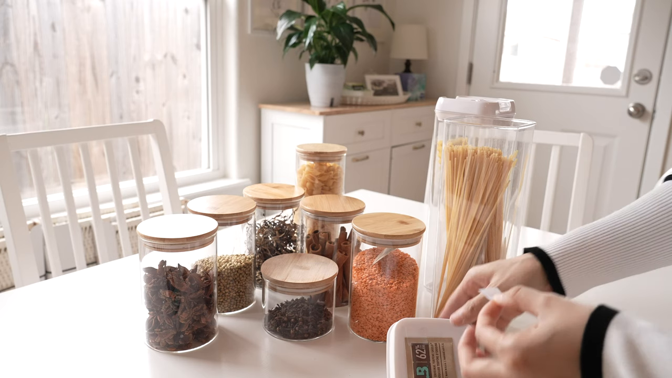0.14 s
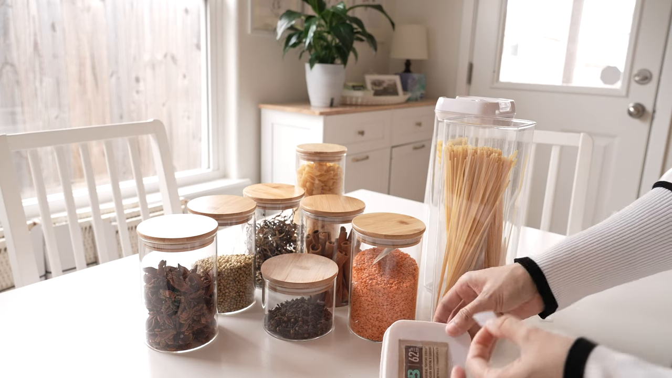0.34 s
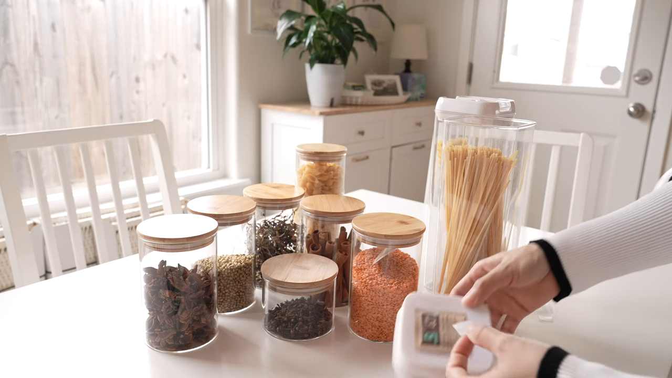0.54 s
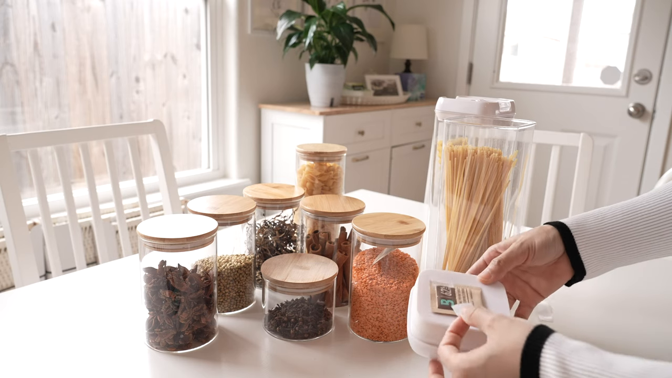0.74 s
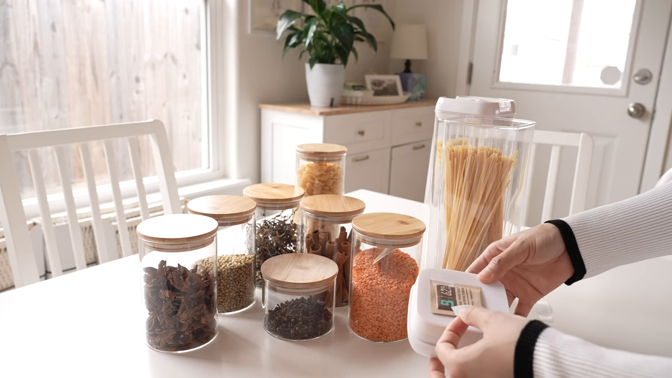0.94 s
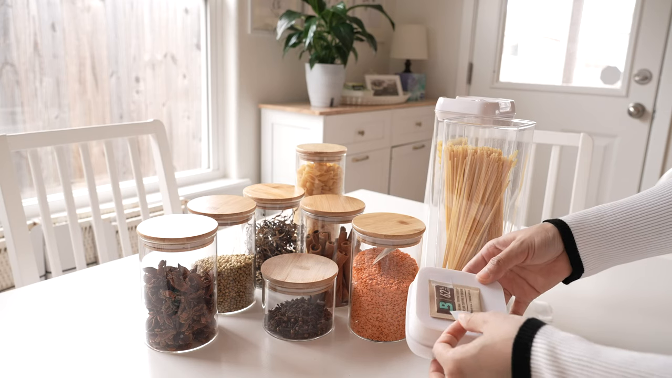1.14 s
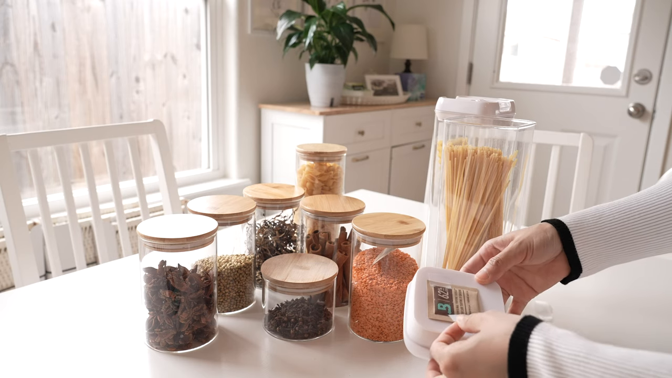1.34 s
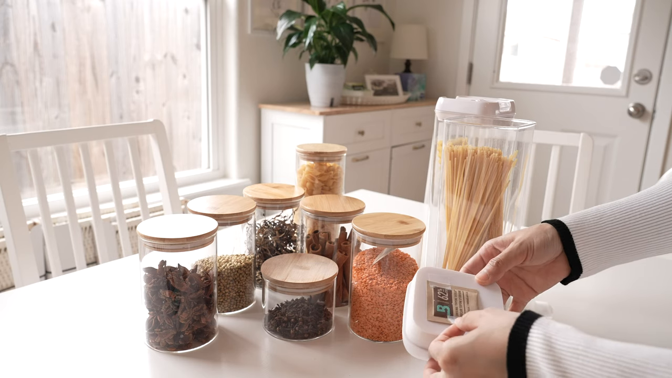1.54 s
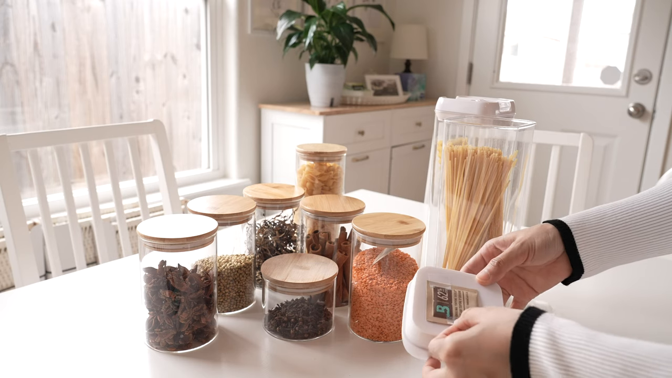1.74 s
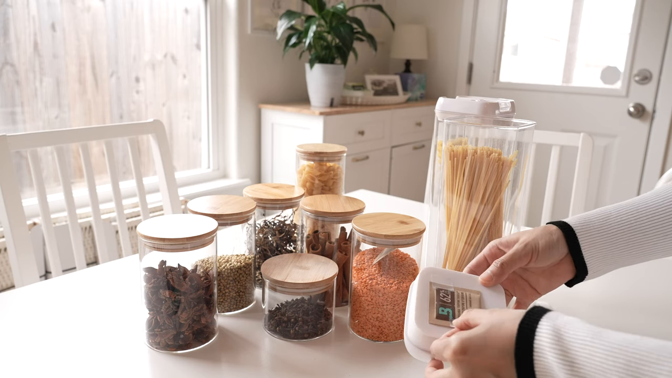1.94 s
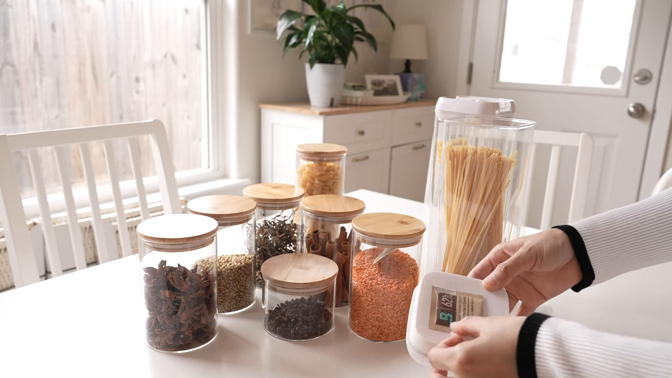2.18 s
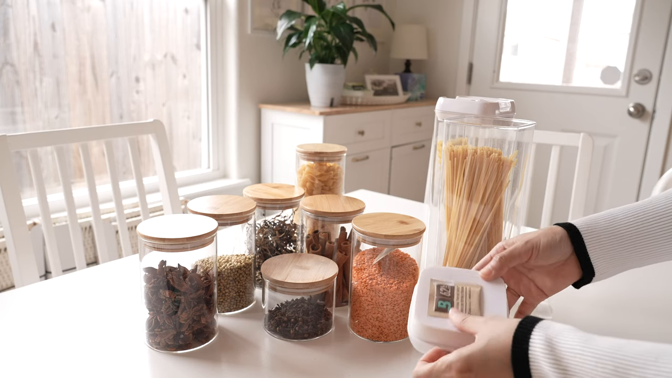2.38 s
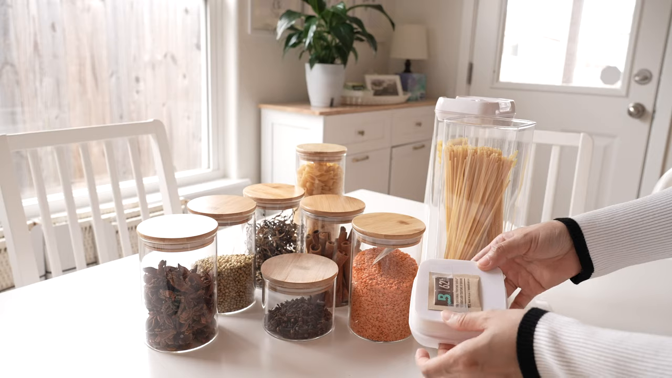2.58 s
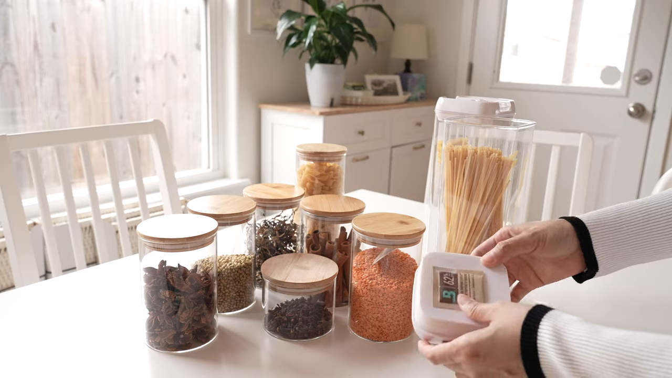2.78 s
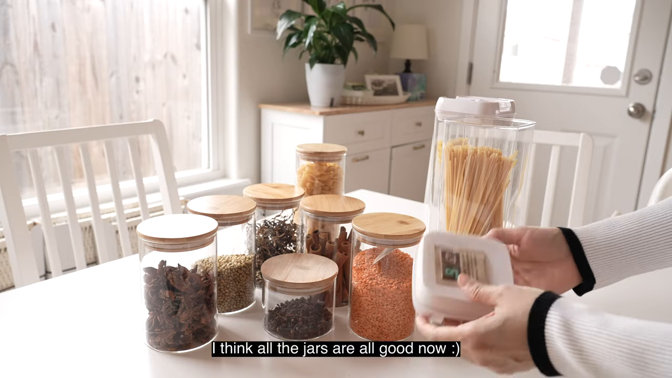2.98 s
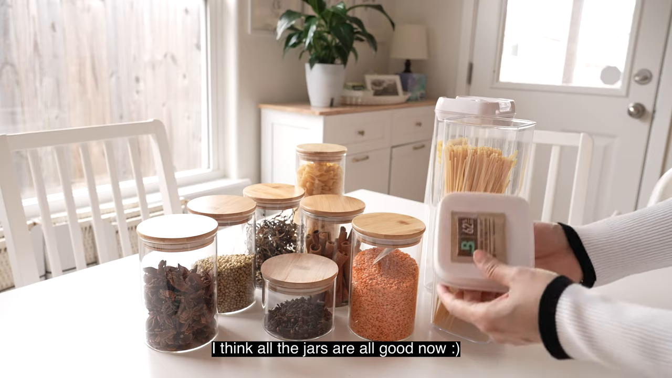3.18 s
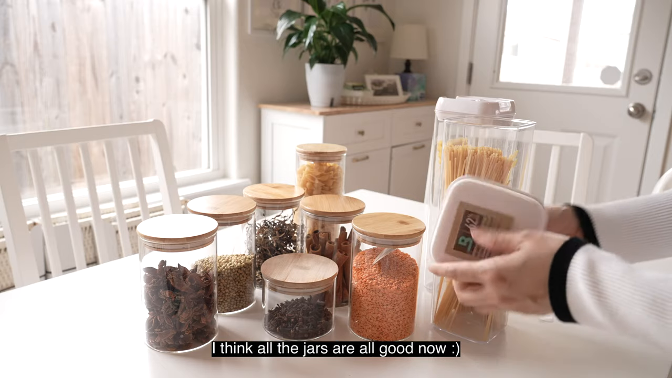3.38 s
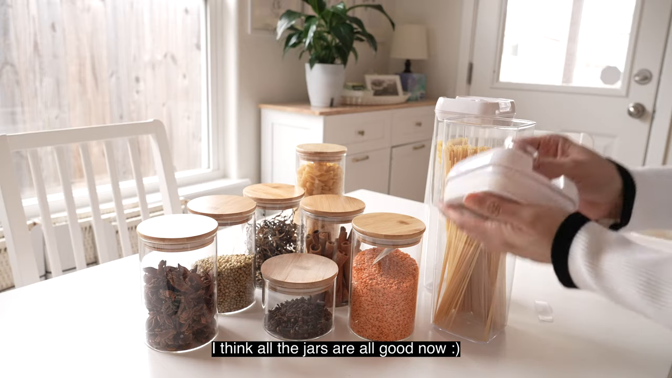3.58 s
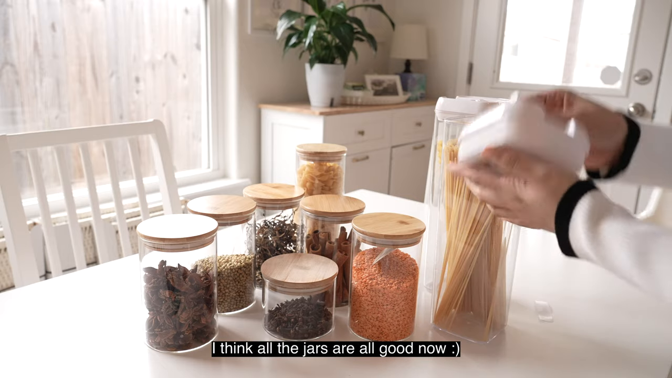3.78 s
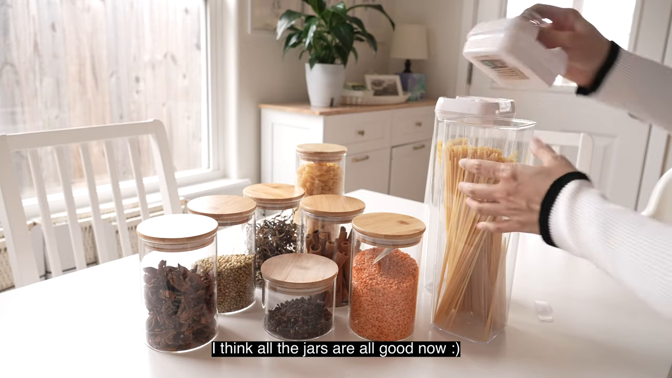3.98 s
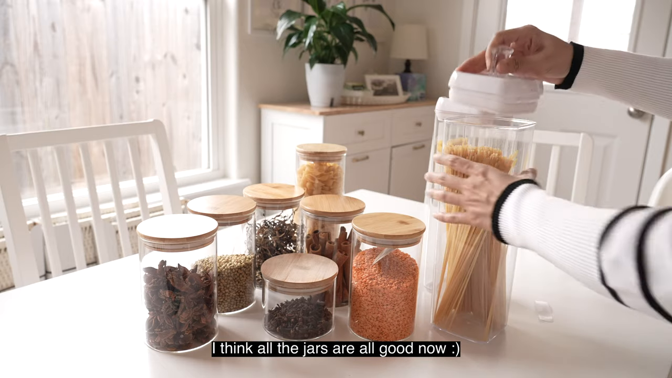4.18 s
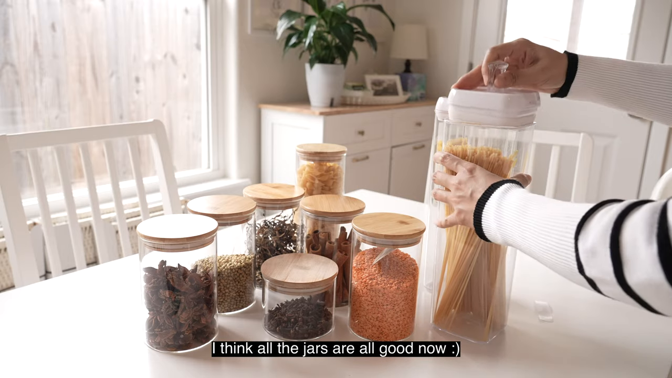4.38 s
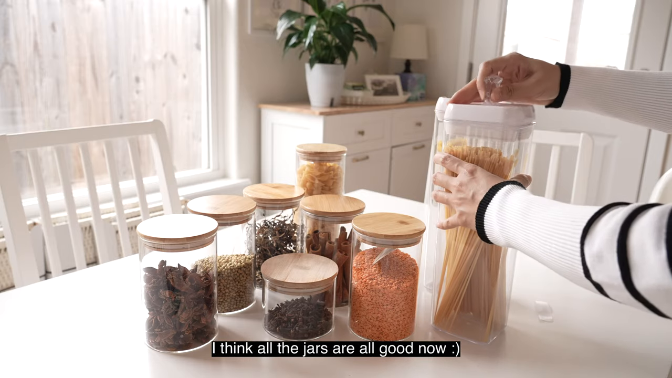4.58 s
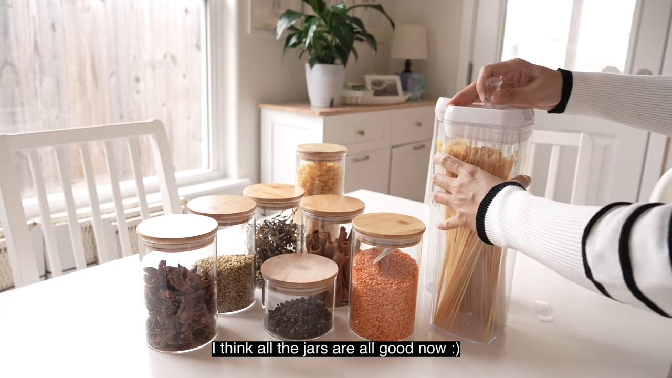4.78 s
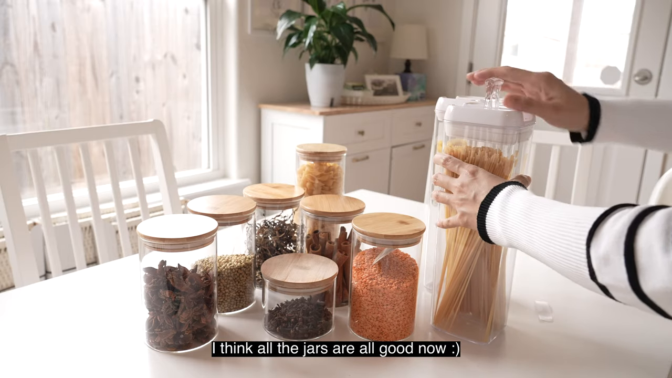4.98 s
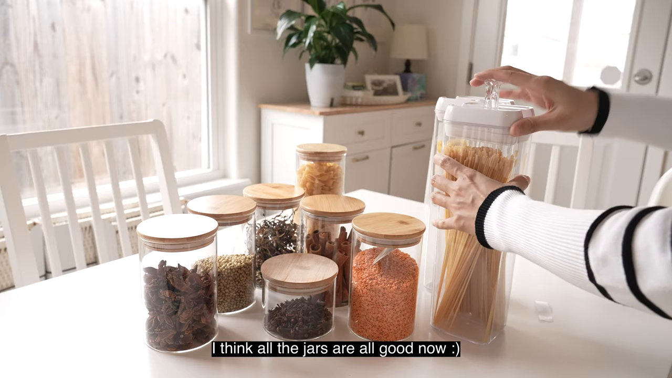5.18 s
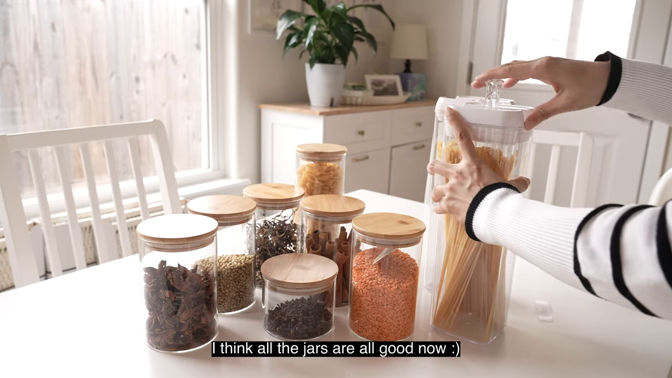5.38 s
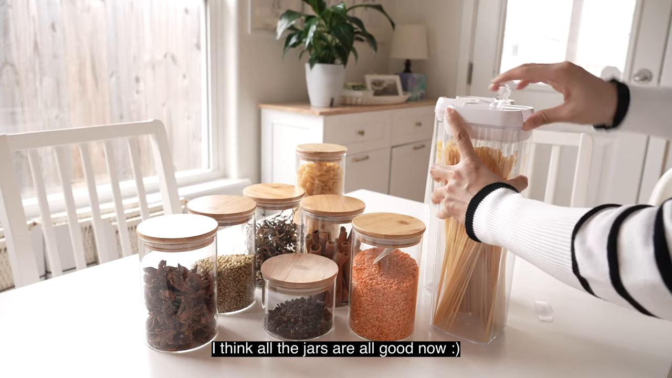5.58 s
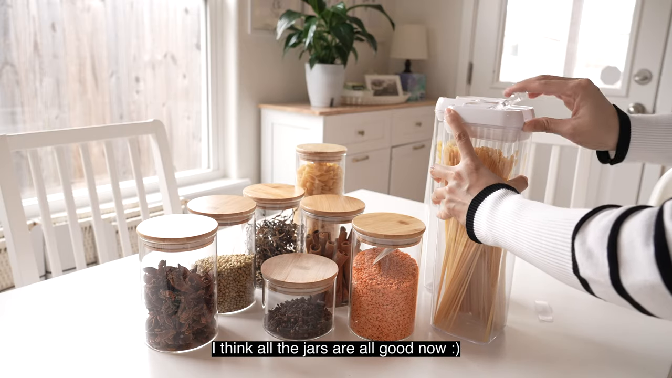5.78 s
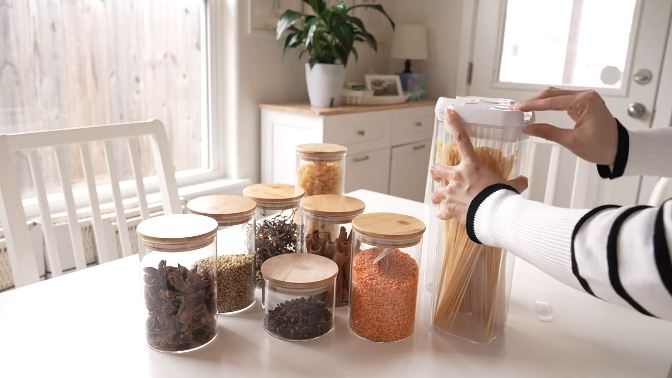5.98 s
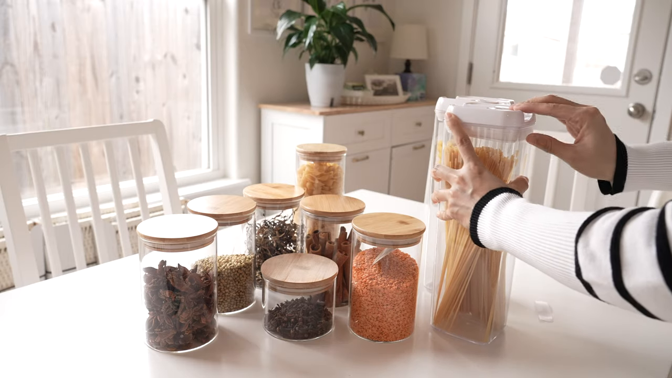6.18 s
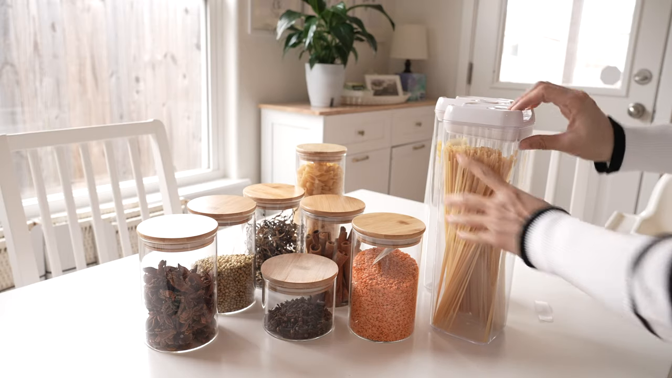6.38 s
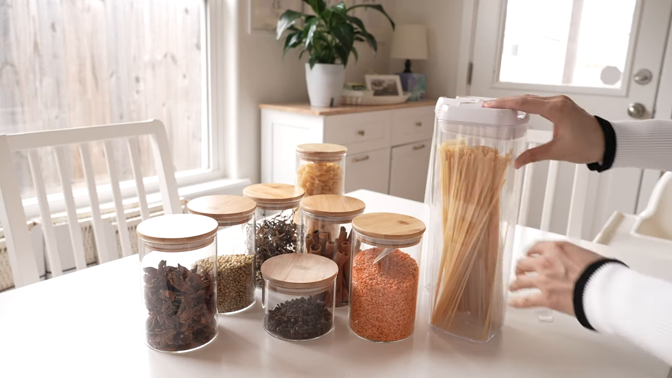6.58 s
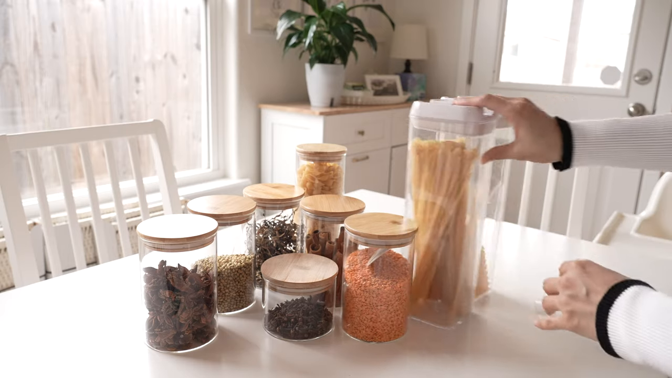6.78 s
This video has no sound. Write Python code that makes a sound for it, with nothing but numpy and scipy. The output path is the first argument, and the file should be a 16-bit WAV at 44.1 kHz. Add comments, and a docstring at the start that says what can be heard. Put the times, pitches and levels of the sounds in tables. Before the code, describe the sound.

Soft plastic bumps, ticks and sleeve rustles lead to a loud latch snap and a container clunking on a table, over a faint hum.

```python
"""Closing a spaghetti container

A plastic lid slides off a kitchen table, ticks under fingernails and is knocked into place on a tall
container of spaghetti. The latch snaps shut, then the container is pushed along and rocks on its base.
Each hit rings a few fading tones; each slide is a hiss full of tiny slips.
Sleeves rustle, an appliance hums, and the bright room answers every knock."""
import sys
import numpy as np
from scipy import signal
from scipy.fft import rfft, irfft, next_fast_len
from scipy.io import wavfile
from scipy.ndimage import uniform_filter1d

SR = 44100
rng = np.random.default_rng(int(sys.argv[2]) if len(sys.argv) > 2 else 0)


def materialize(psi):
    """Save the field psi as 16-bit PCM at rate SR to the path in sys.argv[1].

    A 1-D psi becomes a single channel; in a 2-D psi each row is a channel.
    """
    bounded = np.clip(np.atleast_2d(psi).T, -1, 1)
    quanta = np.round(bounded * 32767).astype(np.int16)
    wavfile.write(sys.argv[1], SR, quanta)


N = 301242
RING_SAMPLES = 4096

# Levels compare rows within a table. A tone with a bigger width fades sooner.
# A lower cutoff means a softer, duller touch. A share says how much another part joins in.
ROOM_NOISE = [(13, -59), (22, -8.5), (64, 3), (84, -27), (97, -12), (146, -22), (192, -11), (267, -13.5),
              (392, -17.5), (438, -20), (516, -13.5), (779, -22.5), (1080, -23.5), (1500, -28.5),
              (15500, -52.5)]  # steady background noise: f/Hz, level/dB
HUM_TONES = [(56.2, -57, 6.3), (74.3, -51, 2.12), (194.6, -57, 3.4), (240.4, -61, 5.1), (386, -66.5, 4.65),
             (594, -64, 5.56), (819, -70, 1.5), (972, -71, 2.4), (1050, -61.5, 0.83), (3960, -79, 104)]  # the appliance: f/Hz, level/dB, width/Hz
CLOTH_RUB = [(400, -6), (1000, 0), (2200, -1), (3200, -3.5), (4400, -1.5), (6500, -10), (9200, -6),
             (12000, -8.5), (15500, -13)]  # brushing cloth: f/Hz, level/dB
STROKES = [(.01, .16, -61, 11000), (.64, 0.13, -64, 6000), (1.954, 0.19, -70, 15000),
           (2.218, 0.45, -65, 14900), (2.554, .15, -62, 15000), (2.655, 0.041, -58.5, 10000),
           (2.842, 0.07, -58.5, 15000), (2.96, 0.14, -66.5, 14000), (3.407, 0.22, -56.5, 15000),
           (3.548, 0.18, -62, 14900), (3.72, 0.39, -70, 12000), (5.292, 0.22, -64, 15000),
           (5.615, .08, -61, 13000), (5.75, 0.093, -54.5, 3450), (6.35, 0.28, -60, 15000),
           (6.51, 0.16, -61, 12000)]  # sleeves and fingertips brush: middle t/s, length/s, level/dB, cutoff/Hz
# nails and edges tick on the lid: t/s, level/dB, cutoff/Hz, touched spot f/Hz, face share
NAIL_TICKS = [(.1227, -47, 4200, 4640, 0.18), (2.0824, -40.5, 6000, 4960, .02),
              (2.152, -39.5, 11600, 6600, .02), (2.188, -42.5, 7300, 5400, .02),
              (2.262, -27, 15200, 9100, 0.91), (2.649, -52, 2500, 2240, .05), (2.927, -50, 9900, 4300, .07),
              (3.812, -55.5, 9000, 7600, .05), (4.605, -53, 12000, 9000, .04),
              (6.547, -35, 3000, 3120, .05)]
RIM_TONES = [(3170, 1000, 1), (4200, 740, 7), (5440, 1600, -0.5), (7100, 580, -1.5), (8720, 1200, 2),
             (13000, 3400, -1)]  # the lid's rim: f/Hz, width/Hz, level/dB
FACE_TONES = [(301, 40, 20.5), (570, 110, 15.5), (1140, 170, 8), (2080, 370, 4.5)]  # the lid's flat face bending: f/Hz, width/Hz, level/dB
LID_BUMPS = [(.187, -36, 890), (.2205, -24, 1500), (.2545, -31, 960), (.33, -29, 900), (.395, -31.5, 890)]  # the lid bumps the table: t/s, level/dB, cutoff/Hz
LYING_LID_TONES = [(500, 77, -1), (673, 99, -4), (855, 160, -10), (1270, 92, -8), (1670, 310, -15),
                   (2760, 340, -27), (4300, 600, -20)]  # the lid lying flat: f/Hz, width/Hz, level/dB
LID_SLIDES = [(.252, 0.15, -26)]  # the lid is drawn off the table: middle t/s, length/s, level/dB
LID_SCRAPE = [(120, -15), (330, -3.5), (410, -14), (500, 1), (650, -10), (890, 3), (1020, -20),
              (1350, -10.5), (1750, -20.5), (2100, -26), (2700, -27.5), (3400, -37.5), (4300, -37),
              (6000, -51), (15000, -59)]  # the lid rubbing the table: f/Hz, level/dB
# lid and hands meet the container: t/s, level/dB, cutoff/Hz, table share, lid share, rim level/dB
KNOCKS = [(4.3746, -23, 544, 0.89, 0.29, -55), (4.433, -30.5, 700, 0.21, 0.67, -53),
          (4.522, -36.5, 500, 1.1, 0.54, -59), (4.579, -32.5, 2570, 0.83, 0.3, -44),
          (4.626, -19, 2600, 1.5, 1.46, -42), (4.671, -27, 438, 0.13, 0.12, -73),
          (4.744, -20.5, 787, 0.17, .5, -53), (4.8922, -39.5, 990, .17, 0.42, -55),
          (5.0427, -34.5, 525, 0.35, 0.35, -59), (5.294, -36.5, 460, 0.78, 0.52, -70),
          (5.494, -31.5, 430, 0.29, 0.58, -51), (5.5843, -40, 586, 0.45, 0.36, -68),
          (6.277, -41.5, 450, .22, 1.2, -70), (6.334, -42, 884, .22, 0.95, -70),
          (6.5478, -34, 4420, 0.7, 0.36, -64)]
CONTAINER_TONES = [(278, 28, 1), (473, 121, 5), (790, 410, -2), (1030, 213, 0.5), (2000, 180, -29),
                   (3000, 490, -13), (4200, 380, -28), (5400, 2100, -18)]  # the container's body: f/Hz, width/Hz, level/dB
TABLE_TONES = [(98.6, 11.3, 3), (126.5, 13.7, 10.5), (140, 90, 5), (255, 56, -0.5)]  # the table top: f/Hz, width/Hz, level/dB
LID_TONES = [(1200, 340, 4), (1654, 540, 1), (1810, 165, 6), (2176, 190, 0.5), (2270, 160, 0),
             (3080, 690, -7.5), (3780, 300, -5), (9000, 790, -12)]  # the lid clacking on the container: f/Hz, width/Hz, level/dB
SNAPS = [(5.957, -3.5, 11400), (5.9643, -21.5, 4770), (5.9745, -39, 9000), (5.9848, -18, 4000)]  # the latch closes: t/s, level/dB, cutoff/Hz
LATCH_TONES = [(440, 145, 0.5), (730, 200, -2), (1030, 220, -8), (1410, 240, -2), (2200, 640, -4),
               (2970, 230, 6.5), (3580, 220, 2.5), (3830, 270, 3.5), (4320, 710, -0.5), (4970, 560, -2.5),
               (6000, 220, -8.5), (6480, 260, -11), (8460, 2000, -13.5), (12600, 1600, -16)]  # the latch and its housing: f/Hz, width/Hz, level/dB
CONTAINER_SLIDES = [(6.745, 0.3, -28.5)]  # the container is pushed: middle t/s, length/s, level/dB
CONTAINER_SCRAPE = [(35, -38), (60, 0), (199, -5), (339, -1), (539, -10.5), (695, -13.5), (1390, -12),
                    (1830, -17.5), (2470, -22.5), (3500, -22), (7000, -35.5), (9450, -32), (15000, -49)]  # the container rubbing the table: f/Hz, level/dB
ROCKS = [(6.7185, -1, 1090, 0.057), (6.7255, -23, 870, 1.4), (6.7345, -21, 1200, 0.098),
         (6.756, -14.5, 2800, 0.087), (6.7695, -9, 480, 0.8), (6.787, -33, 940, 1.2)]  # the rocking base hits the table: t/s, level/dB, cutoff/Hz, table share
BASE_TONES = [(301, 74, 6), (623, 360, 3.5), (786, 138, 10), (1230, 580, -8), (2200, 510, -6),
              (3740, 2000, -15)]  # the container's base: f/Hz, width/Hz, level/dB
ECHOES = [(.0011, 0.083), (.0027, 0.17), (.0046, 0.18), (.0086, .25), (0.0125, 0.18)]  # echoes off the table and jars: delay t/s, share
ROOM_FADE = [(100, 0.95), (350, 0.69), (1000, 0.56), (3500, 0.68), (7500, 0.61), (11000, 0.4),
             (16000, 0.24)]  # how long the room takes to fade by 60 dB: f/Hz, t/s
ROOM_COLOUR = [(80, 1.5), (400, 1), (1500, 1), (3200, -2.5), (8000, 4.5), (11000, -10), (16000, -4.5)]  # the tone the walls give to the echo: f/Hz, level/dB


def amp(db):
    """Turns decibels into a number to multiply by."""
    return 10 ** (np.asarray(db) / 20)


def evened(x):
    """Scales a sound to an average strength (rms) of 1."""
    return x / np.sqrt(np.mean(x ** 2) + 1e-20)


def read(points, hz):
    """Reads between a table's rows, giving each octave equal space."""
    f, value = np.transpose(points)
    return np.interp(np.log(hz + 1), np.log(f + 1), value)


def add(mix, start_s, sound):
    """Mixes a sound in at the given time."""
    part = mix[max(round(start_s * SR), 0):][:len(sound)]
    part += sound[:len(part)]


def dulled(x, cutoff_hz):
    """Turns down the treble above the cutoff."""
    return signal.lfilter(*signal.butter(2, cutoff_hz, fs=SR), x)


def coloured(x, spectrum):
    """Shapes a sound's lows and highs by a table, then scales it to strength 1."""
    size = next_fast_len(N)
    gains = amp(read(spectrum, np.fft.rfftfreq(size, 1 / SR)))
    return evened(irfft(rfft(x, size) * gains, size)[:N])


def friction(spectrum, slips_per_s, hiss=1.0):
    """Rubbing is many tiny, uneven slips over a smooth hiss."""
    slips = rng.standard_normal(N) * (rng.random(N) < slips_per_s / SR)
    return coloured(evened(slips) + hiss * rng.standard_normal(N), spectrum)


def glide(middle_s, length_s, db, power):
    """The loudness of one rub rises and falls as the hand speeds up and slows down."""
    position = (np.arange(N) / SR - middle_s) / length_s
    gain, moving = np.zeros(N), abs(position) < .5
    gain[moving] = amp(db) * np.cos(np.pi * position[moving]) ** power
    return gain


def ring(tones):
    """An object answers a sharp tap with a set of fading tones."""
    t = np.arange(RING_SAMPLES) / SR
    return sum(amp(db) * width * np.exp(-np.pi * width * t) * np.sin(2 * np.pi * hz * t) * (-1) ** k
               for k, (hz, width, db) in enumerate(tones))


def hit(ringing, db, cutoff_hz, chatter=0.97, chatter_s=.003):
    """Plastic chatters briefly as it lands; a softer touch wakes fewer high tones."""
    t = np.arange(RING_SAMPLES) / SR
    grit = rng.standard_normal(RING_SAMPLES) * np.exp(-t / chatter_s)
    grit = signal.lfilter(*signal.butter(1, 1200, "high", fs=SR), grit / np.linalg.norm(grit))
    force = rfft((t == 0) + chatter * grit, 2 * RING_SAMPLES)
    # the chatter spreads the hit in time without changing its tone
    smeared = irfft(rfft(ringing, 2 * RING_SAMPLES) * force / abs(force))[:RING_SAMPLES]
    sound = dulled(smeared, cutoff_hz)
    loudest = np.sqrt(uniform_filter1d(sound ** 2, size=128).max())  # over about 3 ms
    return amp(db) * sound / loudest


def hits(rows, body_tones, *touching_tones):
    """Each hit rings an object and, by their shares, the things touching it."""
    out, body = np.zeros(N), ring(body_tones)
    neighbours = [ring(tones) for tones in touching_tones]
    for start_s, db, cutoff_hz, *shares in rows:
        ringing = body + sum(share * other for share, other in zip(shares, neighbours))
        add(out, start_s, hit(ringing, db, cutoff_hz))
    return out


def appliance_hum():
    """A motor and fan give steady tones that waver slightly."""
    t = np.arange(N) / SR
    steps = np.linspace(0, t[-1], 4096)
    out = np.zeros(N)
    for hz, db, width in HUM_TONES:
        drift = np.cumsum(rng.standard_normal(len(steps))) * np.sqrt(2 * np.pi * width * steps[1])
        out += amp(db) * np.sqrt(2) * np.sin(2 * np.pi * hz * t + np.interp(t, steps, drift))
    return out


def sleeves():
    """Cloth rubs in short swells, duller for a soft touch."""
    rub = friction(CLOTH_RUB, slips_per_s=1800, hiss=.8)
    out = amp(-76.5) * rub  # the sleeves never quite rest
    for middle_s, length_s, db, cutoff_hz in STROKES:
        out += glide(middle_s, length_s, db, power=2.14) * dulled(rub, cutoff_hz)
    return out


def nail_ticks(spot_width_hz=1100, spot_db=5):
    """A nail flicks the rim; the touched spot adds its own pitch, and a hard flick bends the face."""
    out, rim, face = np.zeros(N), ring(RIM_TONES), ring(FACE_TONES)
    for start_s, db, cutoff_hz, spot_hz, flex in NAIL_TICKS:
        spot = ring([(spot_hz, spot_width_hz, spot_db)])
        ringing = rim + flex * face + max(1 - flex, .2) * spot
        add(out, start_s, hit(ringing, db, cutoff_hz))
    return out


def lid_pickup():
    """The loose lid bumps and scrapes as it is drawn off the table."""
    bumps = hits(LID_BUMPS, LYING_LID_TONES)
    swell = sum(glide(*row, power=3.2) for row in LID_SLIDES)
    return bumps + swell * friction(LID_SCRAPE, slips_per_s=1400)


def container_knocks():
    """Putting the lid on knocks the container, which shakes the table and the lid too."""
    return hits([row[:-1] for row in KNOCKS], CONTAINER_TONES, TABLE_TONES, LID_TONES)


def rim_ticks(cutoff_hz=7700):
    """Each knock also rings the lid's rim with a small, bright tick."""
    return hits([(start_s, rim_db, cutoff_hz) for start_s, *_, rim_db in KNOCKS], RIM_TONES)


def latch_snap():
    """The latch flips past its tipping point, then hits its stop."""
    return hits(SNAPS, LATCH_TONES)


def container_slide():
    """The container rubs on the table as it is pushed along."""
    swell = sum(glide(*row, power=1.34) for row in CONTAINER_SLIDES)
    return swell * friction(CONTAINER_SCRAPE, slips_per_s=1800)


def container_rocks():
    """The rocking base taps the table, and both ring."""
    return hits(ROCKS, BASE_TONES, TABLE_TONES)


def with_near_echoes(x):
    """The sound arrives straight, then bounces off the table and jars with less treble."""
    out, bounce = x.copy(), dulled(x, cutoff_hz=7000)
    for delay_s, share in ECHOES:
        add(out, delay_s, share * bounce)
    return out


def kitchen_echo(x, build_s=0.00052, scatter_s=0.025):
    """Nearby jars scatter a short burst of echoes; then lows and highs fade at their own speeds."""
    age = np.arange(SR) / SR
    hz, t, bands = signal.stft(rng.choice([-1., 1.], SR), SR, nperseg=256)
    fade = amp(-60 * t / read(ROOM_FADE, hz)[:, None])
    tail = signal.istft(bands * fade, SR, nperseg=256)[1][:SR]
    spectrum = rfft(tail * (1 - np.exp(-age / build_s)) * (1 + np.exp(-age / scatter_s)))
    # echoes from all sides are even in tone, apart from the colour of the walls
    local_level = np.sqrt(uniform_filter1d(abs(spectrum) ** 2, size=160) + 1e-12)
    spectrum *= amp(read(ROOM_COLOUR, np.fft.rfftfreq(SR, 1 / SR))) / local_level
    tail = irfft(spectrum)[:SR * 3 // 4]
    return signal.oaconvolve(x, tail / np.linalg.norm(tail))[:N]


def scene():
    """Every movement is heard directly and through the room, over steady noise and hum."""
    background = amp(-48) * coloured(rng.standard_normal(N), ROOM_NOISE) + appliance_hum()
    cloth = amp(-0.5) * sleeves()
    ticks = amp(-1) * (nail_ticks() + rim_ticks())
    lid = amp(-3) * lid_pickup()
    knocks = amp(4) * container_knocks()
    snap = amp(-2.5) * latch_snap()
    slide = amp(-1.5) * container_slide()
    rocks = amp(-5) * container_rocks()
    direct = cloth + ticks + lid + knocks + snap + slide + rocks
    into_room = (amp(-7) * (cloth + slide) + amp(-5) * ticks + amp(-5.5) * lid
                 + amp(-3) * knocks + amp(1.25) * snap + amp(0.5) * rocks)
    return (with_near_echoes(direct) + kitchen_echo(into_room) + background)[None]


def record(dry):
    """Flattens any peak that is too loud, then removes the very highest treble."""
    treble_cut = signal.firwin(401, 15900, window=("kaiser", 9), fs=SR)
    return signal.oaconvolve(np.clip(dry, -1, 1), treble_cut[None], "same")


dry = scene()
out = record(dry)
materialize(out)
```